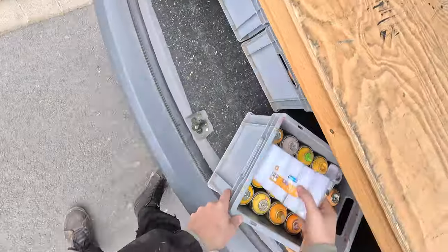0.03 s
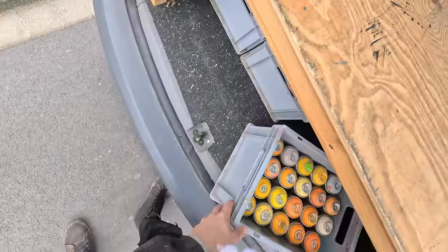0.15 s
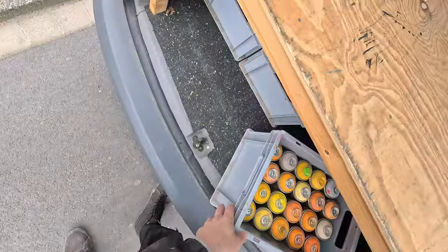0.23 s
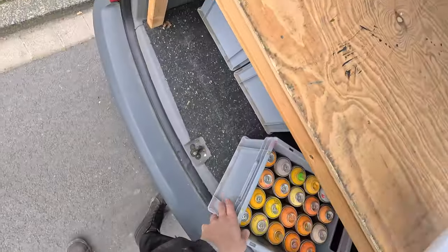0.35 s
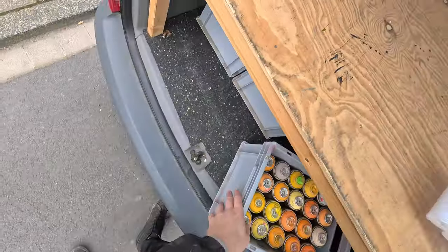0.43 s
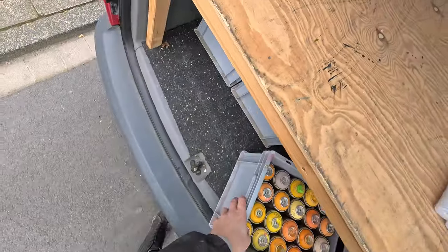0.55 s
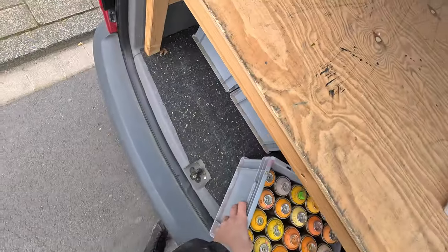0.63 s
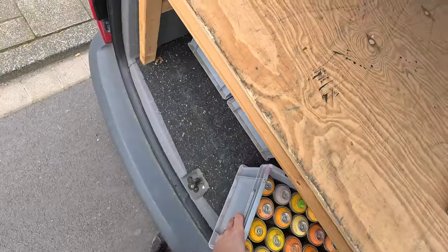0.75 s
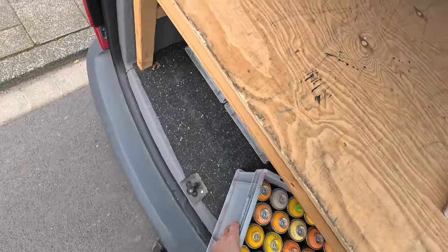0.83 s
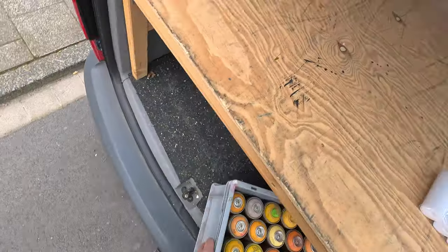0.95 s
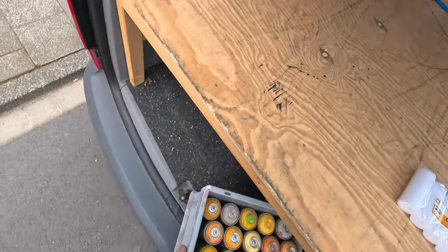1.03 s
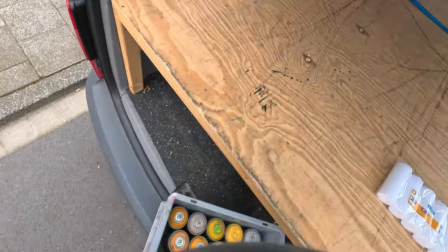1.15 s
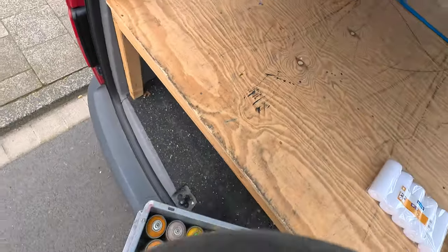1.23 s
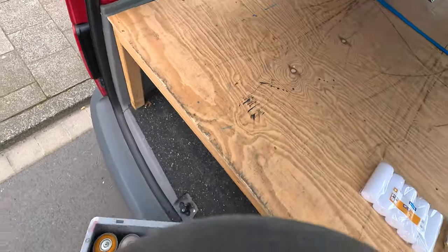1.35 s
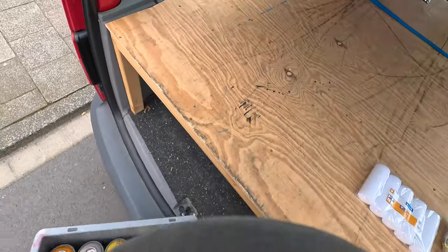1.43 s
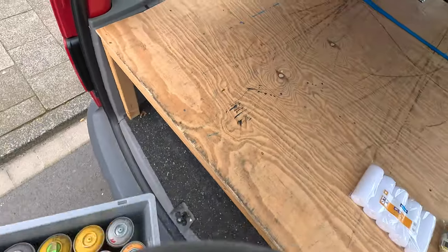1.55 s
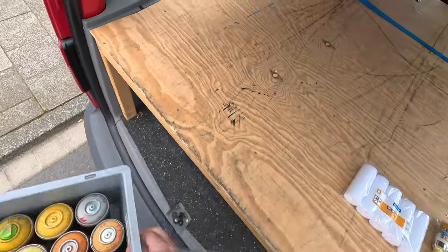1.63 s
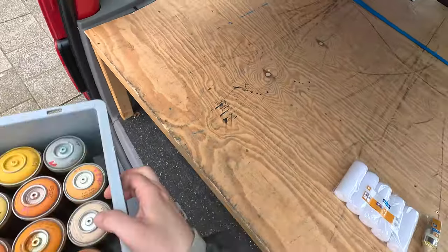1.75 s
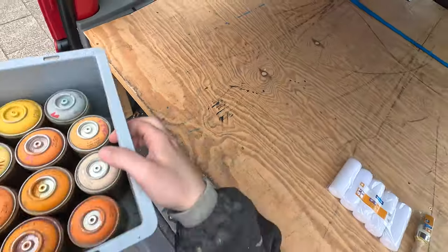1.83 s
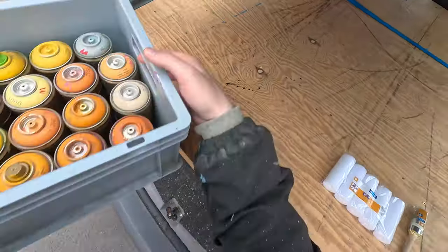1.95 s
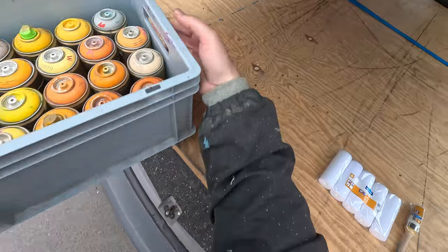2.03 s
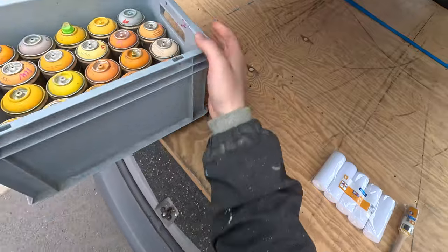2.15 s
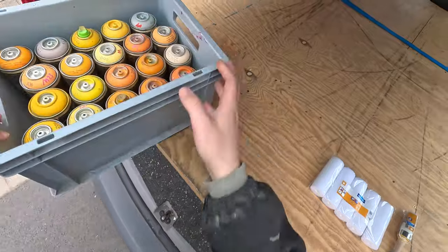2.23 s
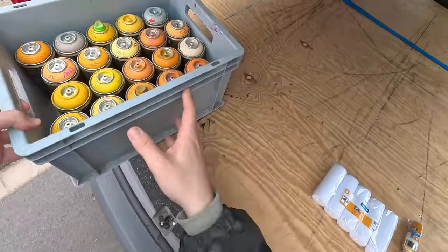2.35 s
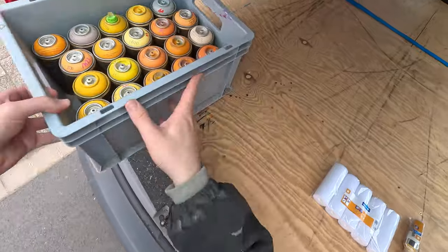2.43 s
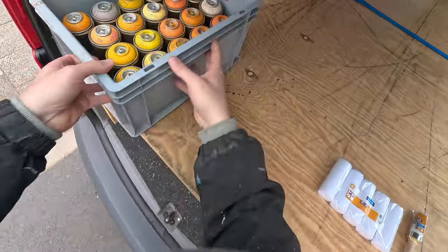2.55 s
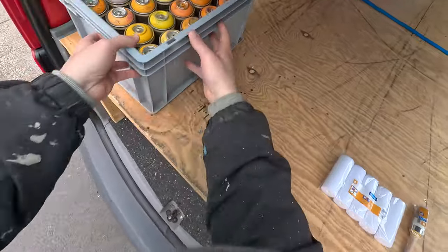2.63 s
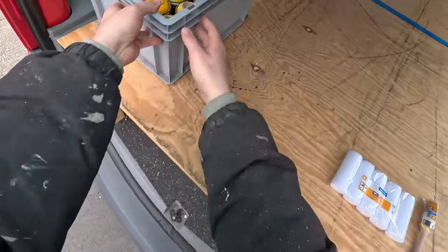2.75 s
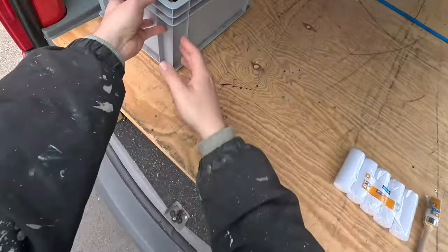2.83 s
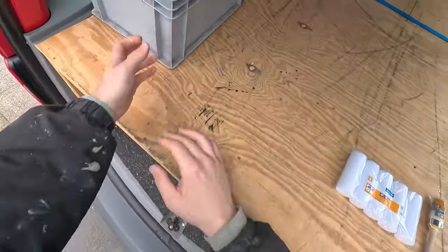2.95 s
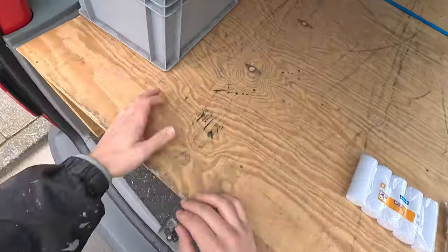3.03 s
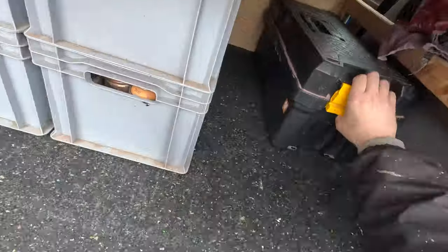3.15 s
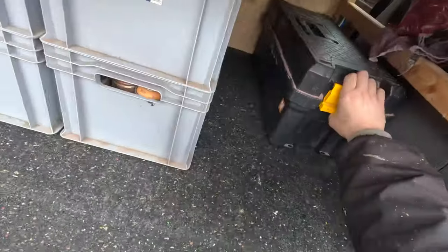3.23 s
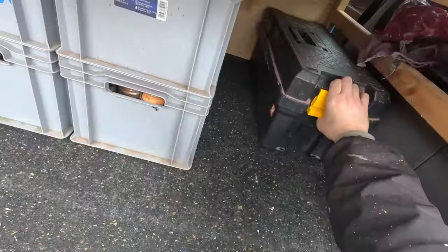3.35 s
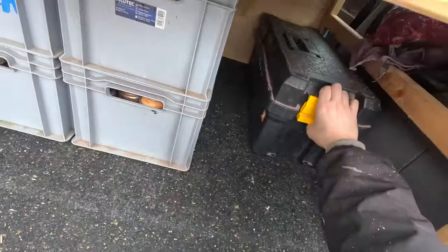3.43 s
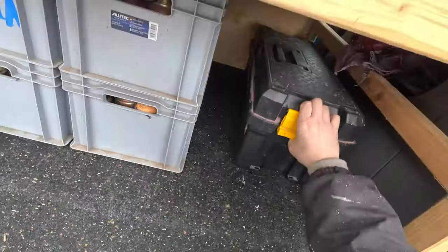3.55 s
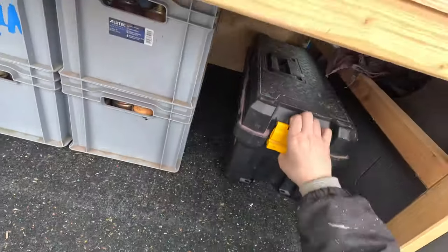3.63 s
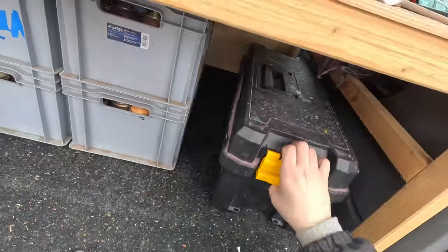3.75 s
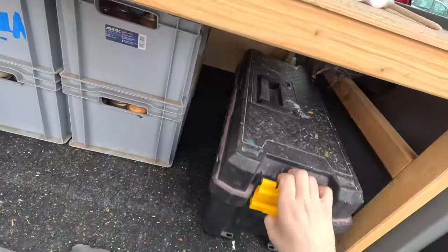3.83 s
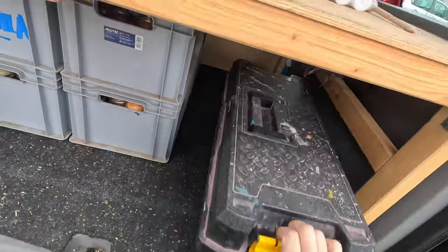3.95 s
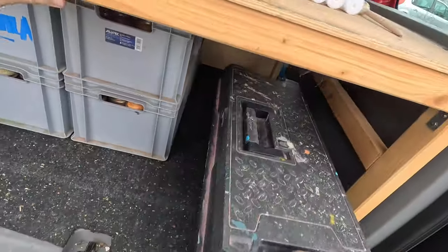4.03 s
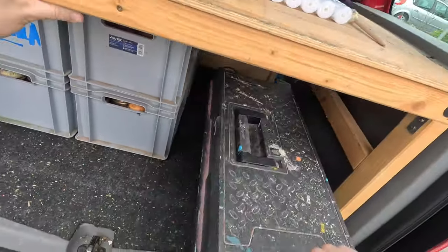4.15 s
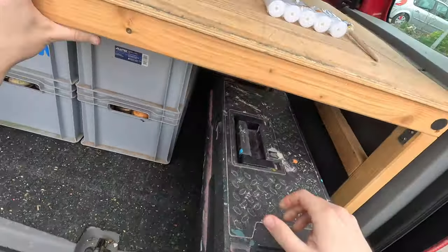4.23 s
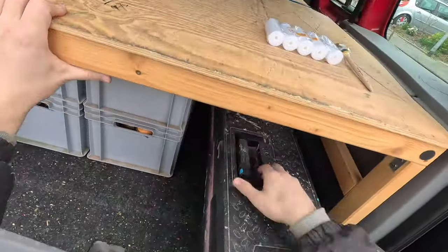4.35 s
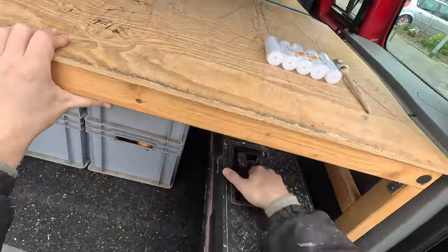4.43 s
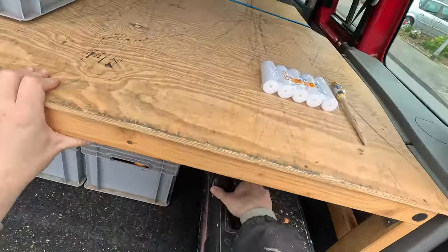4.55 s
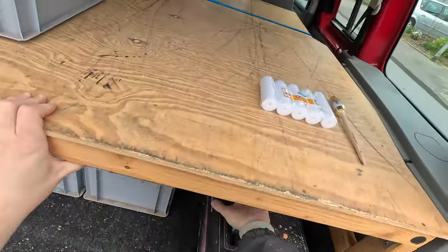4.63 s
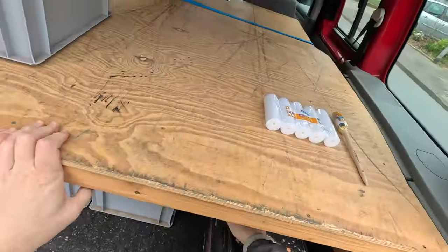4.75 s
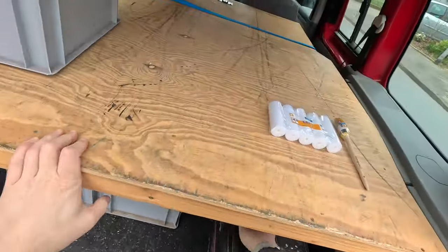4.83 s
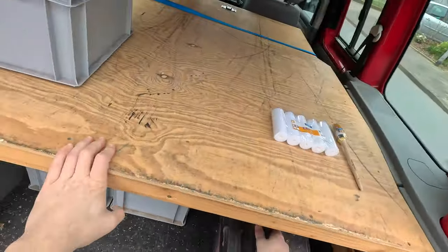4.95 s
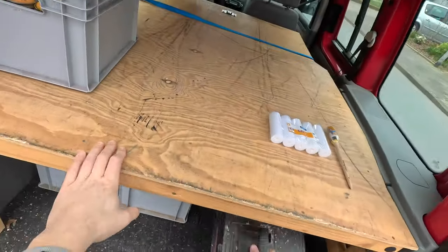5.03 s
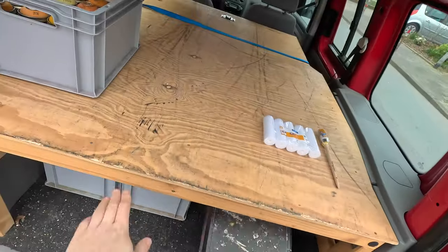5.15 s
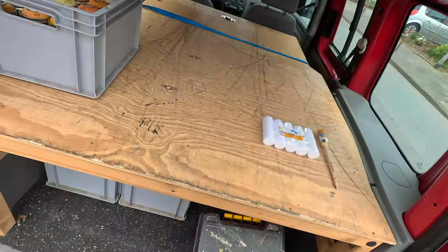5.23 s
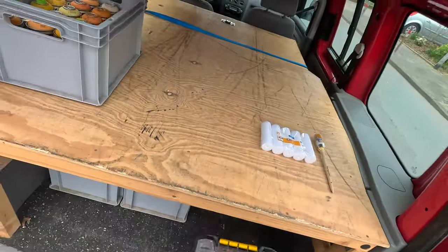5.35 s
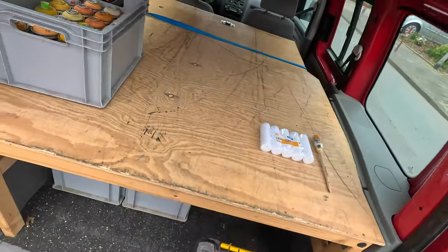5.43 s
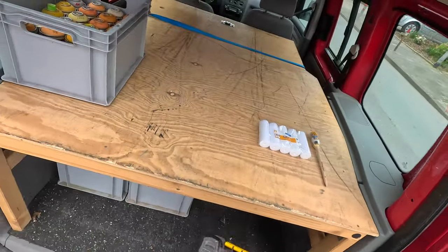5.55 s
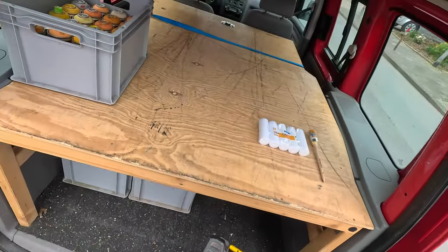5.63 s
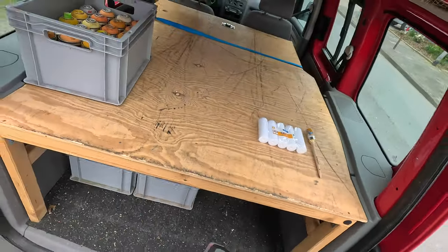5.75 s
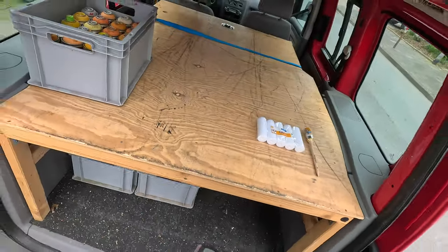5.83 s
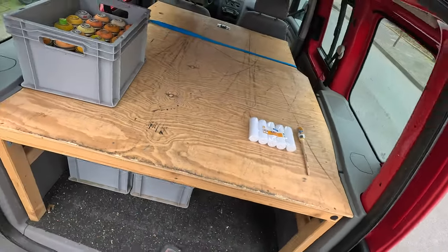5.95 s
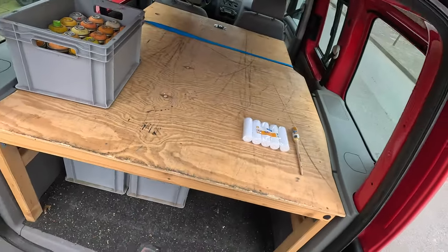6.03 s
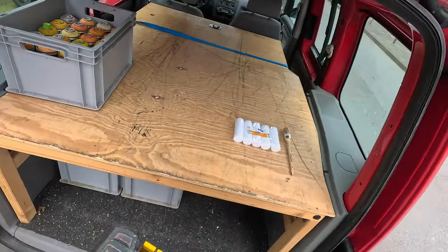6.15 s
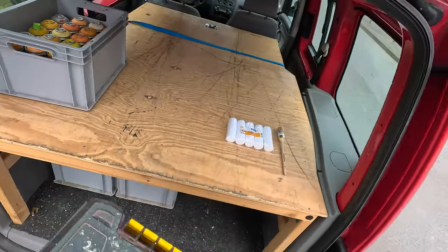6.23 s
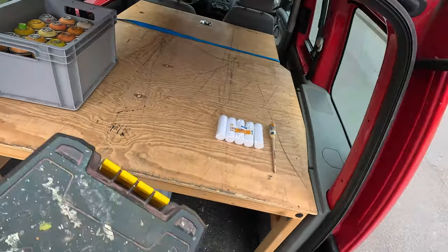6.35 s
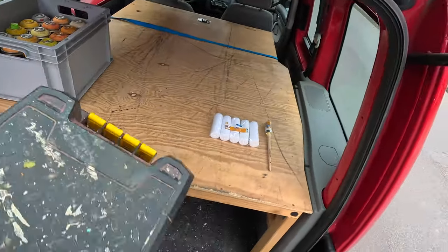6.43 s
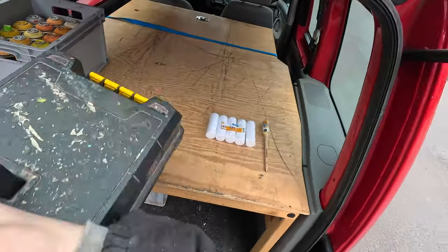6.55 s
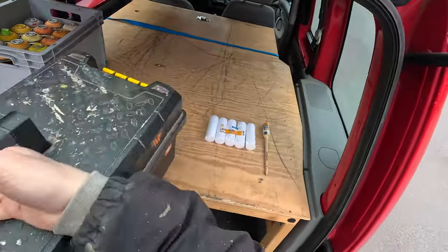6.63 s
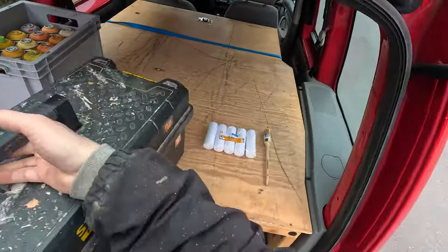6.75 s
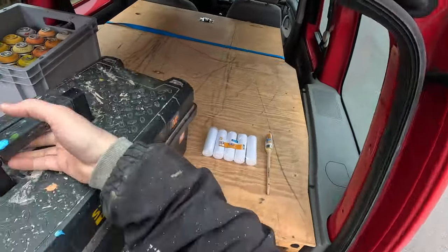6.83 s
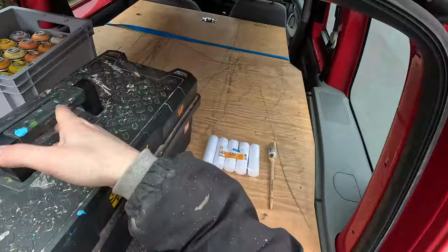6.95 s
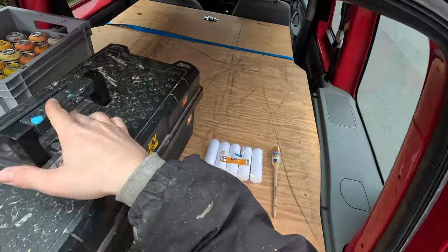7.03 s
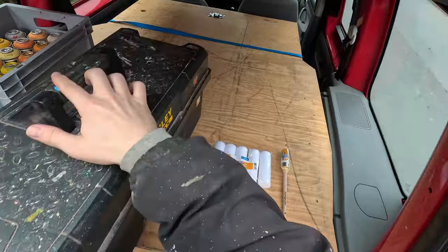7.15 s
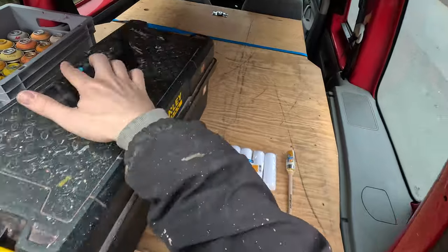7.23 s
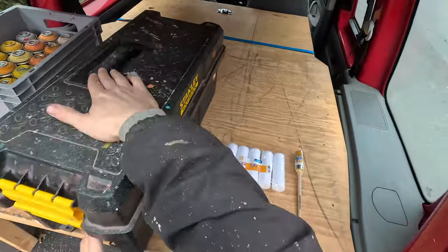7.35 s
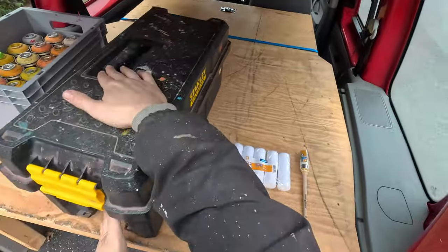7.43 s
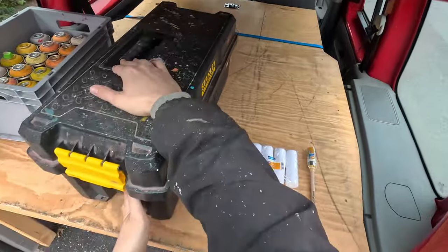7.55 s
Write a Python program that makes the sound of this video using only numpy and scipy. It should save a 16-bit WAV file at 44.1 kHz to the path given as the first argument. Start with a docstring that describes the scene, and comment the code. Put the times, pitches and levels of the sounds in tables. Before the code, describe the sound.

The sound starts on the tail of a thud, drops to silence almost at once and fades back by 0.2 s. Soft cloth rustle and small bumps follow, then a strong hollow knock with clinking spray cans at 0.8-0.95 s as the plastic crate is dragged, scraping until about 1.5 s. A faint bird call sounds near 1.6 s, with light knocks around 1.8 s. At 2.25-2.35 s the crate bangs onto plywood, then scrapes and rumbles along it until 3 s. From 3.2 s a plastic toolbox ticks and slides over gritty matting, knocking hardest around 4.2 s. Quieter handling, a high chirp and a brief finger squeak come near 5-5.2 s, then a bump at 5.3 s and sleeve rustle. The box drops heavily at 6.8-6.9 s, scrapes over the deck, and clacks sharply at 7.46 s. Low street noise continues; the close microphone's image widens after 3.2 s.

```python
"""In a van and on a plywood deck: a plastic crate of spray cans is dragged out, set on the deck and pushed along;
then a plastic toolbox is slid over the floor mat, lifted and dropped on the deck. Random stick-slip impulses
excite damped modes in the slides; short force pulses excite them in the blows and snaps. Sleeves rustle as patchy
hiss; two bird calls and a fingertip squeak are wavering sines; the street is filtered noise.
The sound opens on the end of a thud, stops, and fades back in."""
import sys
import numpy as np
from scipy import signal
from scipy.fft import rfft, irfft, next_fast_len
from scipy.io import wavfile
from scipy.ndimage import uniform_filter1d

SR = 44100
rng = np.random.default_rng(int(sys.argv[2]) if len(sys.argv) > 2 else 0)


def transcribe(u):
    """Save the signal u as a 16-bit wav file named by the first command-line argument.

    u: samples, shape (n,) or (channels, n), limited to [-1, 1]; the rate is SR.
    q: integer samples, one column per channel.
    """
    v = np.clip(np.atleast_2d(u).T, -1, 1)
    q = np.round(v * 32767).astype(np.int16)
    wavfile.write(sys.argv[1], SR, q)


N = 335160

# All levels are those before the stereo image and the microphone.
# Slides, one list of breakpoints per move: [t/s, wall scrape level/dB, van floor boom level/dB,
# deck rumble level/dB, grit and cloth hiss level/dB]
CRATE_MOVES = [
    [(0.14, -71, -63, -63, -83), (0.192, -68, -63, -63, -74), (0.206, -51.5, -58, -59, -50.5),
     (0.34, -48, -57, -55, -44.5), (0.386, -59, -63, -59, -53.5), (0.428, -53, -43, -64, -48),
     (0.5, -60, -34, -54, -57)],
    [(0.5, -62, -41, -56, -57), (0.55, -52.5, -51, -51, -57), (0.596, -57, -22, -51, -39.5),
     (0.68, -60, -50, -52, -46), (0.728, -57, -36, -44, -53), (0.758, -68, -54, -54, -69),
     (0.79, -60, -49, -52, -45)],
    [(0.88, -55, -39, -32, -50), (0.922, -47, -45, -32, -42), (0.976, -34.5, -29, -37, -40),
     (1.102, -42, -30, -36, -50.5), (1.118, -38, -27, -55, -51), (1.148, -48, -37, -34, -49),
     (1.25, -41.5, -32, -39.5, -49.5)],
    [(1.25, -59, -37, -42, -54), (1.274, -45, -25, -35, -44.5), (1.402, -45, -31, -36, -50.5),
     (1.522, -63.5, -75, -51, -69), (1.576, -47, -63, -50, -60), (1.596, -58, -59, -65, -72),
     (1.73, -73, -57, -53, -81)],
    [(1.78, -64, -54, -54, -60), (1.834, -61, -68, -49, -63), (1.846, -72, -49, -55, -71),
     (1.978, -60, -67, -45, -84), (2.11, -45.5, -58, -31, -51), (2.218, -52, -59, -44, -68),
     (2.25, -35, -31, -42, -36)],
    [(2.33, -37, -20, -13, -31), (2.44, -30.5, -24, -26, -40.5), (2.634, -30, -25, -48, -36.5),
     (2.804, -31, -50, -40, -36), (2.902, -31, -21.5, -27, -42), (2.992, -39, -45, -30, -48),
     (3.06, -44, -39, -37, -57)],
    [(3.07, -62, -48, -46, -66), (3.1, -67, -42, -34, -74), (3.126, -67, -27, -39, -67),
     (3.18, -77, -34.5, -46, -79)],
]
BOX_MOVES = [
    [(3.19, -78, -40, -40, -66), (3.216, -58, -60, -36, -51), (3.232, -64, -48, -47, -49),
     (3.302, -65, -56, -54, -77), (3.364, -58, -36, -45, -65), (3.392, -47, -60, -45, -47),
     (3.43, -49, -34, -40, -45)],
    [(3.43, -42, -36, -35, -43.5), (3.484, -44, -18, -33.5, -43), (3.676, -38, -41, -28, -40.5),
     (3.786, -36.5, -24, -27.5, -41), (4.02, -35.5, -26, -28, -33.5), (4.084, -39.5, -45, -38, -39),
     (4.3, -47.5, -41, -58.5, -58)],
    [(4.4, -50, -29, -41, -70), (4.41, -52, -50, -49, -62), (4.512, -55, -39, -56, -53),
     (4.54, -68, -27, -47, -56.5), (4.598, -76, -53, -52, -56), (4.652, -62, -33, -60, -70),
     (4.7, -62, -42, -52, -59)],
    [(4.72, -54, -51, -48, -50), (4.732, -59, -68, -50, -55), (4.772, -57, -47, -45, -73),
     (4.806, -44, -53, -48, -54), (4.826, -46, -48, -41.5, -45.5), (4.956, -61, -59, -41, -66),
     (4.98, -48, -30, -42, -64)],
    [(5.0, -54, -26, -44, -71), (5.046, -64, -61, -47.5, -59), (5.058, -57.5, -49, -47, -55.5),
     (5.202, -48, -39, -49, -45), (5.324, -43.5, -33, -39, -48), (5.5, -46.5, -32, -37, -57),
     (5.62, -98, -40, -54, -95)],
    [(5.65, -55, -35, -38.5, -59.5), (5.818, -50.5, -51, -56, -50.5), (5.868, -50, -54, -61, -54.5),
     (5.89, -48.5, -65, -64, -52.5), (5.97, -50, -44, -62, -57), (6.076, -54, -56, -43, -67),
     (6.1, -49, -41, -50, -62)],
    [(6.18, -58, -28, -53, -56), (6.248, -51, -53, -61, -58), (6.308, -50.5, -29, -72, -53),
     (6.33, -64, -39, -48, -50.5), (6.596, -43.5, -41, -51, -47.5), (6.62, -58, -61, -63, -57.5),
     (6.79, -76, -54, -63, -52.5)],
]
BOX_ON_DECK_MOVES = [
    [(6.83, -50, -1, -51, -68), (6.886, -41, -13, -47, -39), (6.942, -40, -14, -40, -38),
     (6.972, -31, -18, -33, -38.5), (7.012, -40, -38, -43, -45), (7.08, -50, -40, -41.5, -49),
     (7.1, -45, -46, -44, -51)],
    [(7.1, -48, -25, -56, -49.5), (7.204, -32.5, -40, -36.5, -37.5), (7.24, -34, -25.5, -42, -37.5),
     (7.332, -29, -27, -39.5, -38), (7.398, -28, -29, -39.5, -35), (7.44, -36, -19, -50, -41),
     (7.6, -51.5, -29, -45, -56.5)],
]
# Blows of the load: [t/s, knock peak level/dB, thud peak level/dB, rattle t60/s, added panel mode f/Hz,
# added thud mode f/Hz, hollowness (strength of the panel mode) level/dB]
CRATE_BLOWS = [(0.0, -17.5, -8.5, 0.074, 550, 50, 10), (0.163, -37, -64, 0.048, 1290, 51.1, 17),
               (0.299, -26, -31.5, 0.058, 513, 267, -14), (0.582, -29.5, -24, 0.21, 1217, 70.0, 13),
               (0.611, -22.5, -19, 0.081, 460, 104, 18), (0.634, -26, -20, 0.27, 423, 110, 8),
               (0.809, -15.5, -48.5, 0.23, 560, 290, 10), (0.859, -7.5, 1, 0.034, 600, 269, -1),
               (0.868, -30, -15, 0.19, 550, 288, 14), (0.937, -19.5, -21, 0.14, 549, 343, 10),
               (1.044, -23, -30, 0.24, 1560, 105, 12), (1.061, -17, -21, 0.12, 422, 334, 24),
               (1.28, -23.5, -26, 0.27, 550, 114, 22), (1.305, -12, -8.5, 0.064, 408, 167, 18),
               (1.329, -14, -16, 0.13, 550, 158, 6), (1.479, -30.5, -37, 0.09, 592, 78.1, 27),
               (1.744, -38, -31.5, 0.14, 463, 153, 6), (1.767, -21, -27, 0.041, 615, 152, 23),
               (1.822, -23, -51, 0.068, 600, 51.4, 20), (1.854, -21, -54, 0.1, 613, 88.8, 12),
               (2.079, -21, -17.5, 0.12, 410, 167, 4), (2.111, -25.5, -28, 0.27, 398, 230, 2),
               (2.26, -5, -4.5, 0.051, 950, 307, 12), (2.273, -9, -2, 0.14, 880, 78.1, -8),
               (2.315, -5, -5, 0.034, 910, 81, 12), (2.348, -12.5, -13, 0.21, 413, 70.0, 5),
               (2.946, -17.5, -31, 0.11, 490, 111, 16), (3.049, -55, -44, 0.056, 401, 51.1, 10)]
BOX_BLOWS = [(3.175, -23, -25, 0.078, 414, 262, 24), (3.227, -26, -25, 0.054, 340, 365, 19),
             (3.315, -26, -28, 0.09, 360, 317, 13), (3.344, -20.5, -25, 0.054, 348, 295, 8),
             (3.46, -18.5, -16, 0.15, 383, 129, 2.8), (3.963, -13.5, -16, 0.047, 377, 281, 4.1),
             (4.14, -23, -13, 0.11, 361, 214, 6.8), (4.175, -10.5, -8.5, 0.027, 375, 250, 3.7),
             (4.188, -19, -13, 0.15, 361, 191, 3.5), (4.232, -28, -26.5, 0.041, 348, 178, 5.5),
             (4.341, -19.5, -30, 0.034, 361, 80.7, 4.2), (4.352, -18, -11.5, 0.072, 384, 210, 4.1),
             (4.405, -25, -14, 0.05, 630, 196, 6.6), (4.468, -26, -22, 0.08, 915, 51.1, 5),
             (4.491, -25, -39.5, 0.05, 1176, 51.4, 24), (4.511, -30, -27.5, 0.073, 1176, 70.0, 23),
             (4.75, -25, -47, 0.061, 390, 61.9, 3.8), (4.797, -28, -30.5, 0.053, 715, 297, 7.3),
             (4.915, -23.5, -22, 0.041, 337, 304, 8.7), (5.325, -19.5, -8, 0.017, 385, 333, 6.5),
             (5.543, -30.5, -48, 0.043, 573, 100, 16), (5.654, -30, -38, 0.15, 520, 102, 24),
             (5.681, -27.5, -38, 0.065, 566, 122, 24), (6.135, -30, -23.5, 0.057, 363, 200, 8),
             (6.14, -18.5, -12.5, 0.11, 462, 113, 4.4), (6.272, -37, -35.5, 0.07, 681, 51.1, 8),
             (6.344, -29.5, -20.5, 0.084, 570, 160, 6.4), (6.416, -26.5, -40, 0.054, 1210, 51.1, 5.1),
             (6.456, -30.5, -48, 0.079, 1360, 53.8, 8), (6.61, -37, -46, 0.045, 600, 105, 8),
             (6.649, -41, -43, 0.05, 1110, 51, 8), (6.709, -35, -50, 0.038, 1180, 51.7, 9.8),
             (6.734, -31.5, -44, 0.081, 1180, 67.3, 14), (6.811, -8.5, -3.5, 0.099, 1110, 135, 12),
             (6.888, -19.5, -7, 0.15, 370, 73.4, 4.7), (6.922, -9.5, -5, 0.14, 420, 72, 2.7),
             (6.989, -26, -12, 0.053, 412, 258, 4.5), (7.155, -34, -20.5, 0.022, 985, 151, 8),
             (7.233, -17, -5.5, 0.017, 353, 85, 14), (7.428, -22, -9.5, 0.15, 800, 82, 7.4),
             (7.456, -12.5, -10, 0.076, 965, 163, 10), (7.486, -40, -14, 0.059, 1170, 118, 8.8)]
# Snaps of cans in the crate, and of latch and tools in the box:
# [t/s, peak level/dB, rattle t60/s, ringing share/0-1, added ring f/Hz]
CAN_SNAPS = [(0.0004, -28.5, 0.12, 0.2, 2850), (0.163, -30, 0.034, 0.4, 2820),
             (0.2894, -28.5, 0.12, 0.34, 4740), (0.5847, -26.5, 0.04, 0, 3400),
             (0.6342, -27.5, 0.09, 0.2, 3360), (0.8078, -14, 0.026, 0.42, 2500),
             (0.8525, -20.5, 0.047, 0.65, 2870), (0.8684, -15, 0.069, 0.78, 2730),
             (0.9355, -15, 0.068, 0.96, 2600), (1.065, -26, 0.056, 0.8, 4010),
             (1.3044, -49, 0.04, 0.65, 2410), (1.3284, -24.5, 0.034, 0.4, 2570),
             (1.7628, -22, 0.055, 0.36, 2360), (1.8193, -29, 0.044, 0.2, 2960),
             (1.852, -28.5, 0.04, 0.2, 4500), (2.0652, -34, 0.032, 0.65, 2670),
             (2.2605, -14.5, 0.022, 1, 2930), (2.2736, -19.5, 0.051, 0.7, 2950),
             (2.314, -21.5, 0.04, 0.3, 3860), (2.3466, -35, 0.035, 0.3, 3040)]
LATCH_SNAPS = [(3.2044, -35, 0.038, 0.3, 2260), (3.3064, -22.5, 0.081, 0.38, 2120),
               (3.3142, -16.5, 0.046, 0.16, 4700), (3.343, -27, 0.028, 0.35, 2700),
               (3.463, -23, 0.031, 0.15, 2820), (3.9618, -21, 0.028, 1, 2540),
               (4.177, -20.5, 0.016, 0.21, 2330), (4.1892, -16, 0.034, 0.13, 2340),
               (4.3435, -27.5, 0.034, 0.52, 2440), (4.455, -32, 0.055, 0.55, 3910),
               (4.4697, -31.5, 0.041, 0.42, 2640), (4.7154, -32, 0.047, 0.32, 2860),
               (4.7478, -24.5, 0.039, 0.26, 3730), (4.7984, -28.5, 0.028, 0.42, 2510),
               (4.917, -32, 0.028, 0.67, 2140), (5.241, -28, 0.016, 0.68, 4460),
               (5.3226, -27.5, 0.028, 0.6, 2840), (6.145, -30.5, 0.033, 0.81, 2140),
               (6.272, -28, 0.034, 0.21, 2100), (6.4189, -24.5, 0.0093, 0.31, 2780),
               (6.4551, -24, 0.034, 0.23, 2970), (6.4697, -18.5, 0.033, 0.19, 2950),
               (6.5472, -29, 0.025, 0.55, 2200), (6.5734, -32, 0.023, 0.35, 2120),
               (6.6095, -34, 0.039, 0.61, 2620), (6.642, -31, 0.034, 0.32, 2350),
               (6.8099, -15, 0.083, 0.73, 2320), (6.888, -25.5, 0.028, 0.3, 4090),
               (6.9244, -24, 0.028, 0.35, 2130), (6.9884, -25.5, 0.084, 0.32, 2450),
               (7.4567, -6.5, 0.017, 1, 2210), (7.485, -40, 0.015, 0.35, 2100)]

# Modes of each body, before any spread or added damping: [f/Hz, relative level/dB, t60/s]
CRATE = [(513, 8, 0.0067), (623, -8, 0.018), (750, 9, 0.01), (919, 2.5, 0.031), (1022, 2.5, 0.03),
         (1200, 3.5, 0.032), (1590, 8, 0.0097), (1980, -8.5, 0.031)]
BOX = [(510, -41, 0.057), (664, -17, 0.14), (803, -2, 0.016), (984, -8.5, 0.024), (1075, 6.5, 0.022),
       (1297, 4, 0.022), (1530, 3, 0.021), (1915, -9, 0.039), (2320, -16, 0.0033)]
FLOOR = [(34.8, -1.5, 0.37), (42.2, -15, 0.13), (62.7, -12, 0.27), (73, -8.5, 0.16), (87.7, -0.5, 0.053)]  # of the van
DECK = [(121.1, 0.5, 0.23), (161, 4.5, 0.11), (207.7, 5, 0.057), (258.3, -5, 0.18), (307.3, -13, 0.36),
        (347, -7, 0.28), (370, -14.5, 0.17)]
CANS = [(2600, 1, 0.034), (2560, -17, 0.12), (2950, -7.5, 0.12), (3076, 0, 0.014), (3680, -22, 0.034),
        (4025, -5.5, 0.08), (4740, -17, 0.04)]
LATCH = [(2250, 14, 0.014), (3440, 0, .012), (4060, 4, 0.021), (5500, -5, 0.013), (6950, -37, .012)]

# Spectra of rough contact: [f/Hz, relative level/dB]
CRATE_GRIT = [(880, -16), (1500, 1.5), (1630, -6), (1930, -4.5), (2250, -6), (3660, -4), (4260, -9.5),
              (7100, -21), (10400, -37), (13500, -26), (22000, -120)]
BOX_GRIT = [(880, -4), (1500, -3), (1790, -2), (1940, -3), (2750, 1.5), (3190, -3.5), (4260, -4.5),
            (5260, -6), (7640, -8.5), (10400, -21), (13500, -27.5), (22000, -120)]
PLYWOOD_GRIT = [(880, -34), (1500, -14), (1900, -0.5), (2360, -7.5), (2730, -4), (3210, -9), (4030, -8),
                (5220, -10.5), (8840, -21.5), (10400, -29), (13500, -40), (22000, -120)]

# Shaking of the load after a blow, in the order walls, floor, deck, grit: [level relative to the blow/dB], [t60/s]
SHAKE_DB = [-14.5, -23, -17.5, -19.5]
SHAKE_T60_S = [0.17, 0.41, 0.19, 0.15]

# Bird calls and a squeaky finger stroke, one list per whistle: [t/s, pitch f/Hz, level/dB, rms waver/share of pitch]
WHISTLES = [
    [(1.55, 2850, -47, 0.016), (1.585, 3010, -46, 0.028), (1.63, 2865, -48, 0.035),
     (1.68, 2850, -48, 0.036), (1.74, 2670, -61, .02)],
    [(4.985, 5600, -52, .03), (5.01, 5460, -55, .04), (5.04, 4820, -45, 0.041), (5.08, 3340, -48, .06),
     (5.12, 2550, -60, .06)],
    [(5.0, 5860, -60, .02), (5.03, 5900, -60, 0.017), (5.1, 5600, -56, 0.026), (5.13, 5630, -58, .03)],
    [(5.13, 5300, -49, 0.072), (5.18, 5220, -52, 0.08), (5.23, 5000, -33, 0.14), (5.255, 5270, -70, 0.045)],
]
# Spectrum of the street: [f/Hz, relative level/dB]
STREET = [(12, -35), (20, 21.5), (60, 10.5), (112, -21), (158, 5), (296, -14), (649, -7), (779, -17),
          (1070, -14), (1390, -16.5), (6840, -26.5), (9120, -33), (10400, -36), (13500, -39), (22000, -120)]
# Side signal against the mid, before the width: [f/Hz, level/dB]
SIDE_DB = [(60, -31), (120, -25), (260, -24.5), (540, -16.5), (1110, -10), (2310, -4.5), (4790, -13),
           (9940, -11)]
# Image, narrow at first and then opening: [t/s, width level/dB, left over right before the bass is centred level/dB]
IMAGE = [(0, -32, 0), (3.15, -65, 0), (3.22, 1, -1.5), (4.1, -1, 0), (5.1, 2, 1.5), (6.5, 2, 2.5),
         (7.6, -3.5, 1.5)]
# Microphone response: [f/Hz, level/dB]
MICROPHONE = [(18, -26), (45, -2), (9000, 2), (11000, -4.5), (14000, -8), (16000, -35)]

STREET_DB = -41.5  # rms
CRATE_RISE_S, BOX_RISE_S, CAN_RISE_S, LATCH_RISE_S, SHAKE_RISE_S = 0.0016, 0.001, 0.0016, 0.0008, 0.0047
# Main contact added, against the largest impact of the rattle; the latch cracks harder than the cans
BLOW_CONTACT, CAN_CONTACT, LATCH_CONTACT = 1, 0.57, 0.88
STOP_S, FADE_START_S, FADE_END_S = 0.033, 0.12, 0.18
EDGE_HZ = 15700


def rub(moves, hits, ticks, walls, grit):
    """Stick-slip friction: slips drive walls, floor, deck and hiss, while contact damps the walls."""
    start_s = moves[0][0][0]
    t = np.arange(start_s, moves[-1][-1][0], 1 / SR)
    n = len(t)
    power = slide_power(t, moves)
    add_shaking(power, t, hits, ticks)
    # contact pressure flickers
    flicker = gain_of(0.45 * evened(uniform_filter1d(rng.standard_normal(n), 500)))
    # three differently tuned contact points
    body = sum(signal.oaconvolve(slips(n, 3000, 2.53), ring(walls, 0, 0.043, 1.35))[:n] for _ in range(3))
    boom = signal.oaconvolve(slips(n, 300, 1.3), ring(FLOOR, size=12000))[:n]
    rumble = signal.oaconvolve(slips(n, 500, 2.3), ring(DECK, 0, 0, 1.55, size=8000))[:n]
    hiss = patchy_hiss(n, grit)
    parts = evened(body) * flicker, evened(boom), evened(rumble), evened(hiss) * flicker
    ends = signal.windows.tukey(n, 800 / n)
    out = np.zeros(N)
    add(out, start_s, ends * (np.sqrt(abs(power)) * parts).sum(0))
    return out


def slide_power(t, moves):
    """Powers of independent motions add: sums the walls, floor, deck and grit curves of all moves."""
    power = np.zeros((4, len(t)))
    for s, *levels in map(np.transpose, moves):
        curves = [gain_of(2 * np.interp(t, s, db, left=-150, right=-150)) for db in levels]
        power += uniform_filter1d(curves, size=600)
    return power


def add_shaking(power, t, hits, ticks):
    """Free decay: after a blow or snap the load keeps shaking, and the power of each layer dies away."""
    # -150 dB leaves a layer unshaken
    jolts = [(s, knock, thud, thud, -150) for s, knock, thud, *_ in hits]
    jolts += [(s, -150, -150, -150, snap) for s, snap, *_ in ticks]
    age = np.arange(SR // 2) / SR
    dying = gain_of(-120 * age / np.array(SHAKE_T60_S)[:, None])  # power, hence twice 60 dB
    dying = dying * np.minimum(age / SHAKE_RISE_S, 1) ** 2
    for s, *levels in jolts:
        if t[0] - 0.03 < s < t[-1]:
            for layer, db, tail in zip(power, np.add(levels, SHAKE_DB), dying):
                add(layer, max(s - t[0], 0), gain_of(2 * db) * tail)


def patchy_hiss(n, grit):
    """Asperity noise: contact spots come and go, so each region of time and frequency varies in level."""
    z = signal.stft(coloured(slips(n, 6000, 0.38), grit), nperseg=256)[2]
    patches = uniform_filter1d(rng.standard_normal(z.shape), size=4, axis=0)
    patches = uniform_filter1d(patches, size=10, axis=1)
    return signal.istft(z * gain_of(1.6 * evened(patches)), nperseg=256)[1][:n]


def blows(rows, walls, rise):
    """Impact excitation of modes: a contact and a short rattle ring the walls, and a blunt push the floor and deck."""
    out = np.zeros(N)
    for s, knock_db, thud_db, t60, panel_hz, thud_hz, hollow_db in rows:
        t, shape, force = rattle(t60, rise, BLOW_CONTACT)
        shove = rng.standard_normal(len(t)) * shape * np.minimum(t / 0.0014, 1)
        shove = signal.oaconvolve(shove, np.hanning(40))  # the heavy push is blunt
        contact_size = 3 + round(0.5 * SR / panel_hz)  # a low panel means a long, soft contact
        soft = signal.oaconvolve(force, np.hanning(contact_size))
        panel = ring(walls, 5.3, 0.043) + ring([(panel_hz, hollow_db, 0.04)])
        ground = ring(FLOOR + DECK, 1.1, 0.04, size=8000) + ring([(thud_hz, 8, 0.1)], size=8000)
        knock = signal.oaconvolve(soft, panel)
        thud = signal.oaconvolve(shove, ground)
        add(out, s, gain_of(knock_db) * knock / abs(knock).max())
        add(out, s, gain_of(thud_db) * thud / abs(thud).max())
    return out


def snaps(rows, metal, grit, rise, contact):
    """Impact of small stiff bodies: hard parts clink together over a dry crack."""
    out, crack = np.zeros(N), causal(grit)
    for s, db, t60, share, clink_hz in rows:
        t, _, tick = rattle(t60, rise, contact)
        part = ring(metal, 1.5, 0.01, size=2500) + ring([(clink_hz, 3, 0.022)], size=2500)
        clink = signal.oaconvolve(tick, part)[:len(t)]
        dry_crack = signal.oaconvolve(tick, crack)[:len(t)]
        snap = share * evened(clink) + (1 - share) * evened(dry_crack)
        add(out, s, gain_of(db) * snap / abs(snap).max())
    return out


def whistle(rows):
    """Frequency modulation and multipath: a quickly wavering sine is blurred by echoes; returns start and sound."""
    s, *columns = np.transpose(rows)
    t = np.arange(s[0], s[-1], 1 / SR)
    hz, db, waver = (np.interp(t, s, c) for c in columns)
    hz = hz * (1 + waver * evened(uniform_filter1d(rng.standard_normal(len(t)), size=40)))
    tone = gain_of(db) * np.sin(2 * np.pi * np.cumsum(hz) / SR)
    echoes = slips(2000, 770, 1.5) * gain_of(-40 * np.arange(2000) / 2000)
    return s[0], signal.oaconvolve(tone, echoes / np.linalg.norm(echoes))


def street():
    """Stationary noise: a steady background of fixed spectrum and rms level."""
    return gain_of(STREET_DB) * evened(coloured(rng.standard_normal(N), STREET))


def rattle(t60, rise, contact):
    """Repeated impact: the force is a main contact and a dying shower of small ones; returns time, shape, force."""
    t = np.arange(SR // 9) / SR
    shape = gain_of(-60 * t / t60) * np.minimum(t / rise, 1)
    force = slips(len(t), 6000, 1.88) * shape
    force[round(rise * SR)] += contact * abs(force).max()
    return t, shape, force


def slips(count, per_s, spread_db):
    """Random impulse process: tiny impacts of a rough contact, a few of them large."""
    size = gain_of(spread_db * np.minimum(rng.exponential(1, count), 5))
    return size * rng.standard_normal(count) * (rng.random(count) < per_s / SR)


def ring(modes, spread_db=0., detune=0., damping=1.0, size=4000):
    """Modal superposition: an impulse response whose mode strengths and tunings vary with the place struck."""
    hz, db, t60 = np.transpose(modes)[:, :, None]
    strength, tuning = rng.standard_normal((2, len(modes), 1))
    t = np.arange(size) / SR
    decay = gain_of(db + spread_db * strength - 60 * damping * t / t60)
    return (decay * np.sin(2 * np.pi * hz * (1 + detune * tuning) * t)).sum(0)


def coloured(x, points):
    """Linear filtering: multiplies the spectrum of x by a response of (f/Hz, level/dB) points."""
    hz, db = np.transpose(points)
    size = next_fast_len(len(x) + 2048)
    f = np.fft.rfftfreq(size, 1 / SR)
    response = gain_of(np.interp(np.log(f + 1), np.log(hz), db))
    return irfft(rfft(x, size) * response, size)[:len(x)]


def causal(points):
    """Minimum phase: the Hilbert transform of the log gain gives an impulse response with an immediate onset."""
    hz, db = np.transpose(points)
    f = abs(np.fft.fftfreq(2048, 1 / SR))
    log_gain = np.log(gain_of(np.interp(np.log(f + 1), np.log(hz), np.maximum(db, -90))))
    return np.fft.ifft(np.exp(np.conj(signal.hilbert(log_gain)))).real[:1024]


def gain_of(db):
    """Logarithmic level: converts dB to an amplitude ratio."""
    return 10 ** (np.asarray(db) / 20)


def evened(x):
    """Normalisation: scales x to unit rms."""
    return x / np.sqrt(np.mean(x ** 2) + 1e-20)


def add(mix, s, sound):
    """Superposition: adds a sound into mix, in place, from s seconds on."""
    part = mix[round(s * SR):][:len(sound)]
    part += sound[:len(part)]


def stereo(mid):
    """Diffuseness: one close source field, with a weak diffuse part that differs between the two sides."""
    z = signal.stft(mid, nperseg=256)[2]
    # a random phase in each cell of time and frequency makes this part diffuse
    turn = np.exp(2j * np.pi * rng.random(z.shape))
    diffuse = coloured(signal.istft(z * turn, nperseg=256)[1][:N], SIDE_DB)
    s, width_db, pan_db = np.transpose(IMAGE)
    t = np.arange(N) / SR
    upper = coloured(mid, [(150, -20), (900, -2.5)])  # bass reaches both sides nearly alike
    pan = np.tanh(np.log(gain_of(np.interp(t, s, pan_db))) / 2)
    side = diffuse * gain_of(np.interp(t, s, width_db)) + upper * pan
    return np.array([mid + side, mid - side])


def scene():
    """Superposition: the slides, blows, snaps, whistles and street add up before the stereo image."""
    mid = rub(CRATE_MOVES, CRATE_BLOWS, CAN_SNAPS, CRATE, CRATE_GRIT)
    mid += rub(BOX_MOVES, BOX_BLOWS, LATCH_SNAPS, BOX, BOX_GRIT)
    mid += rub(BOX_ON_DECK_MOVES, BOX_BLOWS, LATCH_SNAPS, BOX, PLYWOOD_GRIT)
    mid += blows(CRATE_BLOWS, CRATE, CRATE_RISE_S)
    mid += blows(BOX_BLOWS, BOX, BOX_RISE_S)
    mid += snaps(CAN_SNAPS, CANS, CRATE_GRIT, CAN_RISE_S, CAN_CONTACT)
    mid += snaps(LATCH_SNAPS, LATCH, BOX_GRIT, LATCH_RISE_S, LATCH_CONTACT)
    for rows in WHISTLES:
        add(mid, *whistle(rows))
    mid += street()
    return stereo(mid)


def record(dry):
    """Transduction: microphone colour, a cut to silence and a fade-in, soft saturation, then the band limit."""
    t = np.arange(N) / SR
    fade_in = np.clip((t - FADE_START_S) / (FADE_END_S - FADE_START_S), 0, 1)
    gate = (t < STOP_S) + fade_in
    heard = np.array([coloured(x, MICROPHONE) for x in dry]) * gate
    held = 1.219 * np.tanh(heard / 1.154)
    band_limit = signal.firwin(511, EDGE_HZ, window=("kaiser", 9), fs=SR)
    return signal.oaconvolve(held, band_limit[None], "same")


dry = scene()
out = record(dry)
transcribe(out)
```